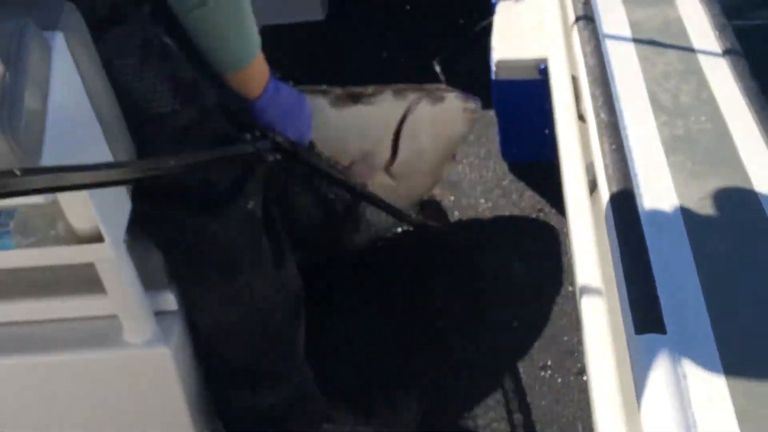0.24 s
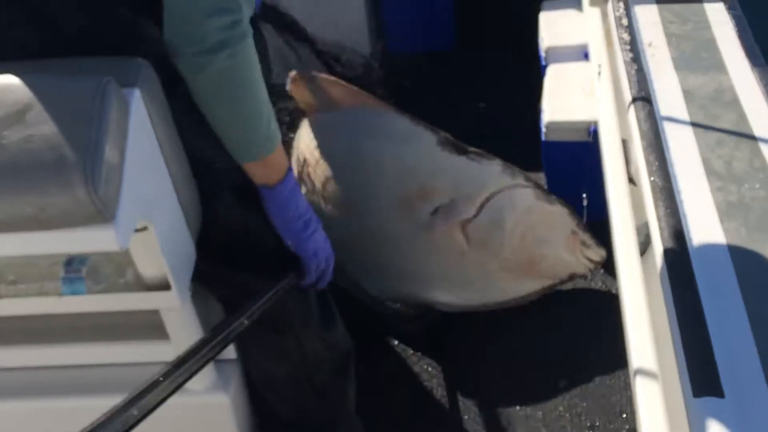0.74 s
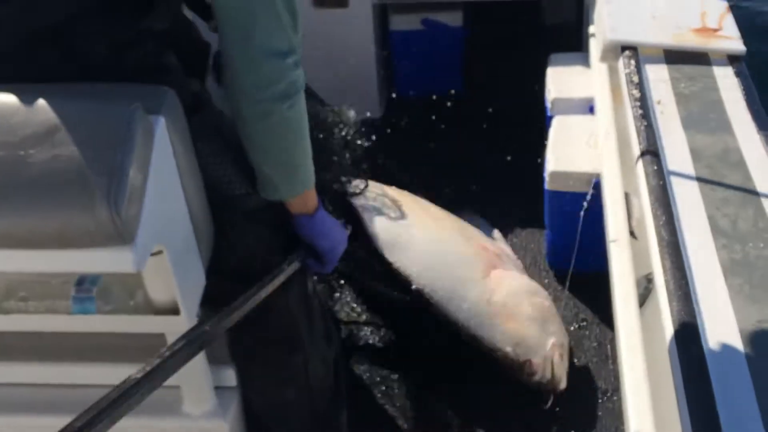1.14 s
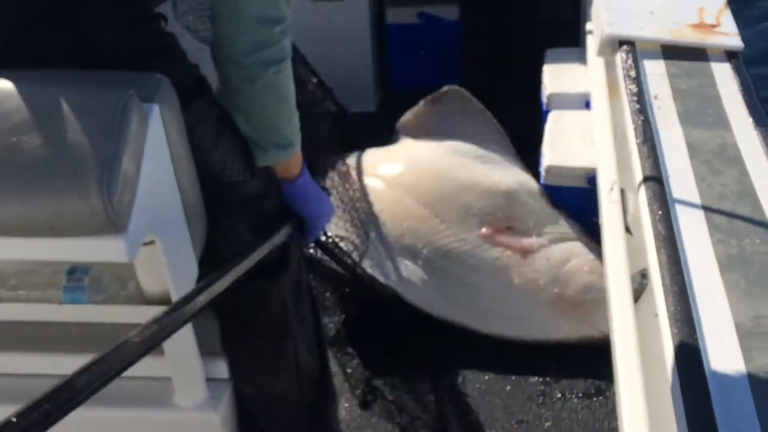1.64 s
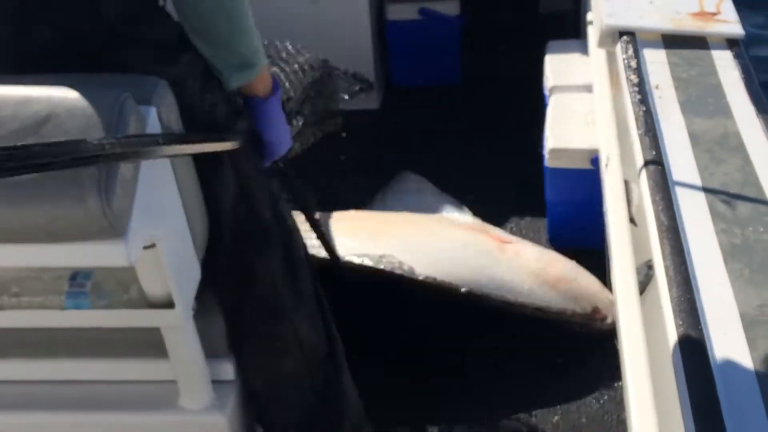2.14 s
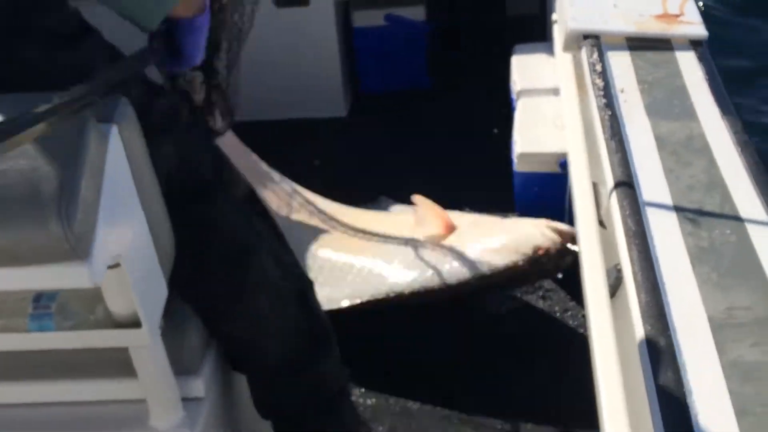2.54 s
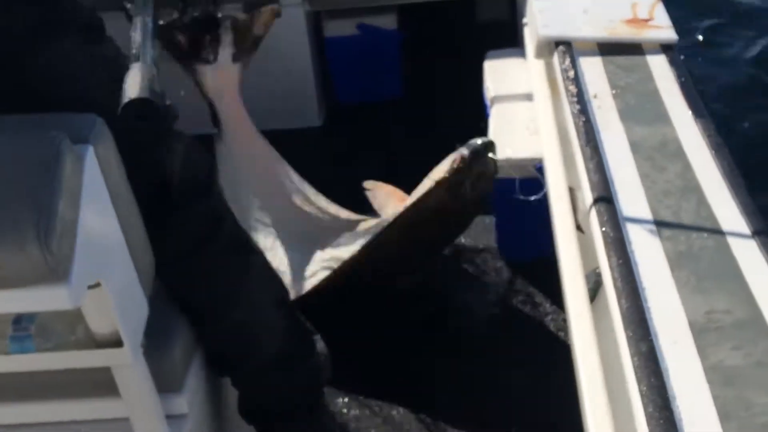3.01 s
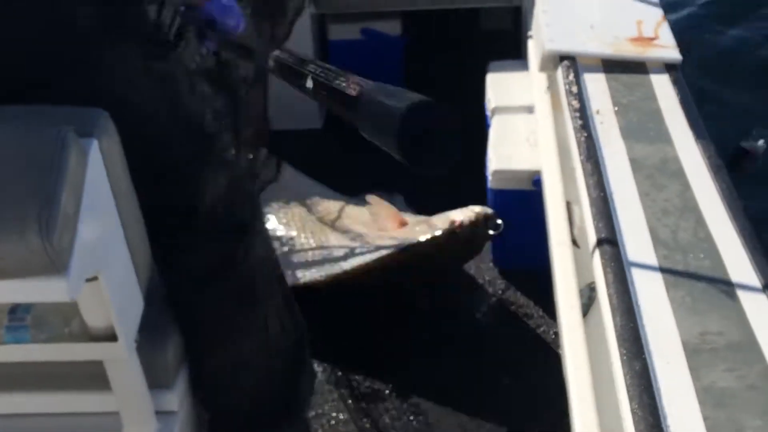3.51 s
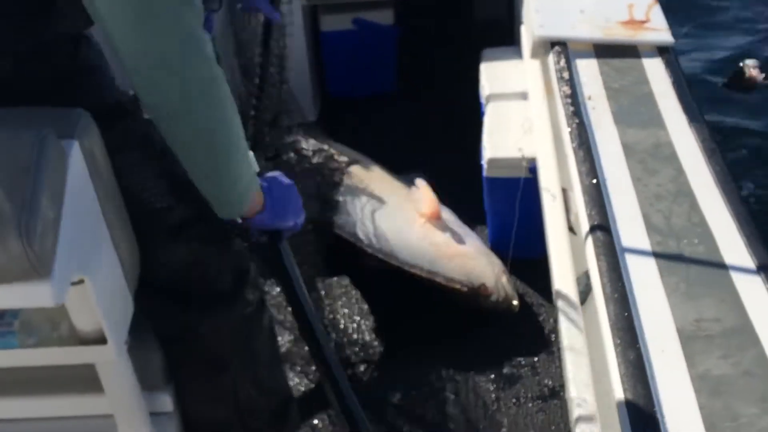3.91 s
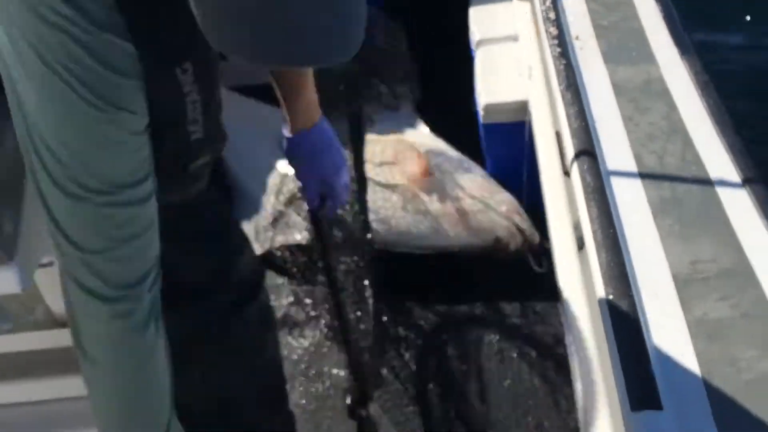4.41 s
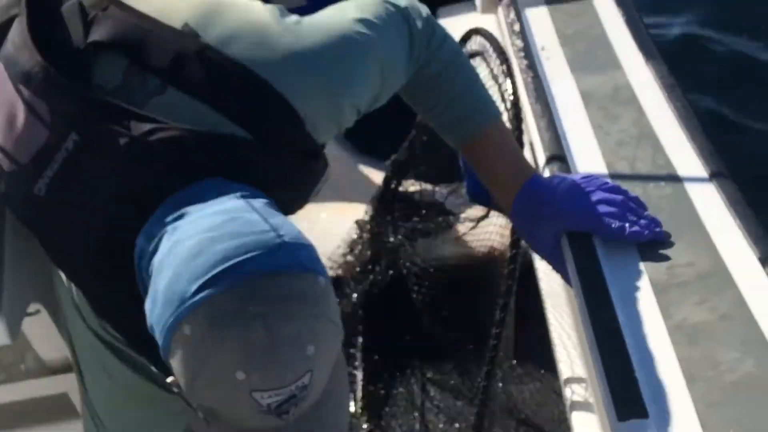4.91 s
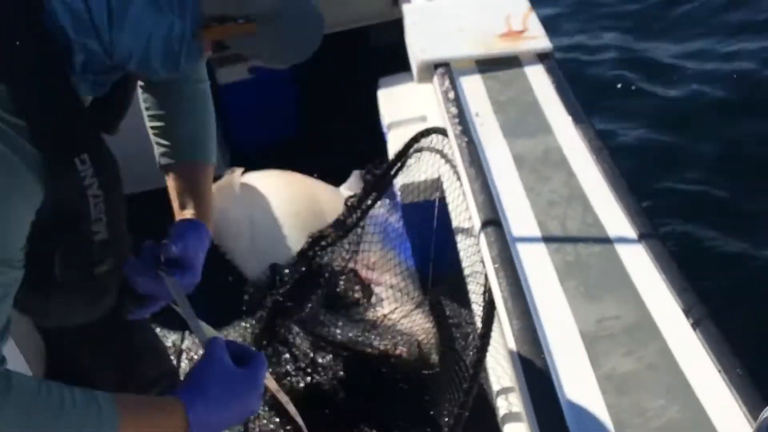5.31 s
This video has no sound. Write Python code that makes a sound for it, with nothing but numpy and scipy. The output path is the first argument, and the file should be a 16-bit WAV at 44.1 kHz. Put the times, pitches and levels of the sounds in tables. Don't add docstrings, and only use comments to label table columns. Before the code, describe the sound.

Close up on a small boat, a big flatfish thrashes in a landing net. Wet slaps and hollow thumps burst out irregularly, the metal pole ringing in the first second. Plastic boxes knock, mesh rasps, skin squeaks faintly. Blows cluster, pause briefly, then return hard before fading to weaker bumps. Short cockpit echo; the loudest hits are squashed by a phone's limiter.

```python
import sys
import numpy as np
from scipy import signal
from scipy.fft import rfft, irfft
from scipy.io import wavfile
from scipy.ndimage import uniform_filter1d, map_coordinates

SR = 44100
rng = np.random.default_rng(int(sys.argv[2]) if len(sys.argv) > 2 else 0)


def invert_db(level):
    return 10 ** (np.asarray(level, dtype=float) / 20)


def transcribe(signal):
    frames = np.atleast_2d(signal).T
    limited = np.clip(frames, -1, 1)
    pcm = np.round(limited * 32767).astype(np.int16)
    wavfile.write(sys.argv[1], SR, pcm)


N = 244755

# frequency [Hz], density [dB per Hz].
BOOM_COLOUR = [(25, 2.5), (50, 7), (85, 11), (120, 16.5), (170, -42)]
# frequency [Hz], density [dB per Hz].
RUB_COLOUR = [(150, 8.5), (400, 14), (900, 8), (1500, -4), (2500, -44)]
# frequency [Hz], density [dB per Hz].
RASP_COLOUR = [(710, 7), (1200, -6), (1870, -1), (3250, -6.5), (7330, -11.5), (12700, -22.5), (15000, -28),
               (16000, -41)]


def unit(x):
    return x / np.sqrt(np.mean(x ** 2) + 1e-20)


def along(points, hz):
    f, v = np.transpose(points)
    f = np.r_[f[0] / 2, f, f[-1] * 2]
    v = np.r_[v[0] - 60, v, v[-1] - 60]
    return np.interp(np.log(hz + 1), np.log(f + 1), v)


def wobble(rate, size=N):
    knots = rng.standard_normal(int(size * rate / SR) + 4)
    return map_coordinates(knots, [np.arange(size) * rate / SR])


def uneven(f, depth_db):
    knots = rng.standard_normal(64)
    return invert_db(depth_db * map_coordinates(knots, [6.52 * np.log2(1 + f / 300)], mode="wrap"))


def noise(response, size=N):
    spectrum = rfft(rng.standard_normal(size))
    return unit(irfft(spectrum * response(np.fft.rfftfreq(size, 1 / SR)), size))


def coloured(points):
    return lambda f: invert_db(along(points, f))


def resonance(f, hz, width_hz):
    return 1j * f * width_hz / (hz * hz - f * f + 1j * f * width_hz)


def deck(f):
    # frequency [Hz], width [Hz], level [dB].
    panels = [(73, 15, -1), (116, 45.4, 1.5), (159.5, 39, 3.5), (225, 40.4, 0), (280, 18, -1.5),
              (330, 43, -7.5)]
    return sum((-1) ** k * invert_db(db) * resonance(f, hz, width) for k, (hz, width, db) in enumerate(panels))


def fade(t, t60, rise):
    return (1 - np.exp(-t / rise)) * invert_db(-60 * t / t60)


def blank(size):
    return np.zeros(N + SR), np.arange(size) / SR


def add(track, s, sound):
    track[round(s * SR):][:len(sound)] += sound


def air():
    # frequency [Hz], density [dB per Hz].
    hiss_colour = [(400, -10), (700, -9), (1300, -12), (4000, -28), (9500, -28), (15500, -27)]
    return invert_db(-54.5 + 1.6 * wobble(12)) * noise(coloured(hiss_colour))


def walls():
    # frequency [Hz], t60 [s].
    decay = [(100, 0.58), (400, 0.22), (2000, 0.056), (10000, 0.061)]
    hz, t, z = signal.stft(rng.standard_normal(SR // 2), SR, nperseg=256)
    t60 = np.interp(hz, *np.transpose(decay))[:, None]
    tail = signal.istft(z * invert_db(-60 * t / t60), SR, nperseg=256)[1]
    return np.pad(tail / np.linalg.norm(tail), (200, 0))


def restless():
    # time in seconds, weight rocking on the deck in dB, sliding in dB.
    unrest = [(0, -31, -27.5), (.29, -18.5, -38.5), (.5, -29, -54), (.74, -43, -24), (.94, -54, -53),
              (1.239, -14, -28), (1.37, -36.5, -53), (1.53, -26, -49), (2.54, -27.5, -52.5),
              (2.749, -35, -24), (3.02, -58, -64), (3.18, -44, -53), (3.39, -33, -50), (3.86, -41.5, -43),
              (4.28, -50, -53), (4.59, -22.5, -22), (4.8, -28.5, -58), (5.55, -48, -37)]
    s, *levels = np.transpose(unrest)
    rumble_db, rub_db = (np.interp(np.arange(N) / SR, s, c) for c in levels)
    boom_db = -39 + 0.11 * (rumble_db - rumble_db.mean())
    rasp_db = -48 + 0.75 * (rub_db - rub_db.mean())
    boom = invert_db(boom_db + 2.5 * wobble(4.9)) * noise(coloured(BOOM_COLOUR))
    rumble = invert_db(rumble_db + 2.37 * wobble(13)) * noise(lambda f: deck(f) * f ** 2 / (f ** 2 + 130 ** 2))
    rub = invert_db(rub_db + 1.7 * wobble(30)) * noise(coloured(RUB_COLOUR))
    grain = invert_db(4.4 * wobble(35) + 1.9 * wobble(500))
    rasp = invert_db(rasp_db) * grain * noise(coloured(RASP_COLOUR))
    return boom + rumble + rub + rasp


def squeaks():
    # start in seconds, level in dB, pitch in Hz,
    # length in seconds.
    slips = [
        (0.662, -34, 1890, 0.18),
        (1.034, -33, 3820, 0.088),
        (3.384, -26, 4600, 0.0068),
        (3.628, -30, 2468, 0.028),
        (4.019, -31, 2460, 0.016),
        (4.234, -28.5, 2386, 0.019),
        (4.853, -32, 3900, 0.029),
        (5.303, -35.5, 2490, 0.049),
    ]
    out = np.zeros(N + SR)
    for s, db, hz, length in slips:
        size = int(2.5 * length * SR)
        t = np.arange(size) / SR
        phase = 2 * np.pi * hz * np.cumsum(1 + 0.0099 * wobble(107, size)) / SR
        level = invert_db(db + 3.5 + 2.4 * wobble(136, size))
        add(out, s, level * np.sin(phase) * fade(t, 3 * length, 0.0014))
    return out[:N]


def drags(table):
    out, t = blank(16384)

    def patch(tilt_db):
        catches = invert_db(3.5 * wobble(45, len(t)) + 3.5 * wobble(800, len(t)))
        return catches * noise(lambda f: invert_db(along(RASP_COLOUR, f) + tilt_db * np.log2(1 + f / 2000))
                               * uneven(f, depth_db=2.6), len(t))

    for s, length, start_db, end_db, tilt_db in table:
        level_db = np.interp(t, [0, length], [start_db, end_db])
        level_db = level_db - 700 * np.maximum(t - length, 0)
        rasp = unit(patch(tilt_db) + patch(tilt_db))
        add(out, s, invert_db(level_db) * (1 - np.exp(-t / 0.0033)) * rasp)
    return out[:N]


def pole():
    # start in seconds, level in dB, seconds until a hand stills it.
    blows = [
        (.215, -20.5, 0.11),
        (0.244, -27, 0.036),
        (0.311, -32, 0.079),
        (.403, -17.5, 0.051),
        (0.454, -21, 0.086),
        (0.481, -29, 0.07),
        (.72, -45, 0.071),
        (.77, -26.5, 0.058),
    ]
    # frequency in Hz, level in dB, t60 in seconds.
    tube = [(856, 0, .45), (965, -2, .3), (1890, -11, .45), (3900, -18, .45)]
    out, t = blank(16384)
    for s, db, free in blows:
        stilled = invert_db(-900 * np.maximum(t - free, 0))
        for hz, level_db, t60 in tube:
            shake_db = rng.normal(0, 1) + 5.0 * wobble(76, len(t))
            note = np.sin(2 * np.pi * hz * t) * fade(t, t60, 0.0019)
            add(out, s, invert_db(db + level_db + shake_db) * stilled * note)
    return out[:N]


def rings():
    # (frequency in Hz, level in dB, t60 in s).
    patches = [(1.009, -9, [(1085, 3.5, 0.055), (2000, -8.5, 0.066)]), (1.118, -13, [(2630, -2, 0.095),
               (6100, -4, 0.06)]), (1.426, -11, [(616, -6, 0.44), (852, 1, 0.098)]),
               (1.81, -15.5, [(685, -1.5, 0.41), (984, -3, 0.1), (1280, -8, 5.0), (1830, -2, 0.054)]),
               (1.943, -14, [(4370, -7, 0.13), (6280, -7, 0.044), (6977, -8, 0.042)]),
               (2.118, -13.5, [(1060, -1, 0.17), (1550, -5, 0.072), (3590, -6, 0.11), (6600, -9, 0.08)]),
               (2.269, -12, [(1840, -2.5, 0.15), (3530, -3, 0.084), (6410, 2.5, 0.019)]),
               (3.223, -15.5, [(856, 0, 0.13), (2270, 11, 0.025)]), (3.431, -16.5, [(973, 0, 5.0),
               (1270, -6, 5.0), (2290, 0, 0.21)]), (3.759, -19, [(1500, -7, 0.38), (3910, 2, 0.2),
               (5000, -9, 0.5), (5870, -1, 0.19)]), (4.063, -21.5, [(1860, -3, 0.77), (2406, -1, 0.092),
               (4355, 1, 0.04)]), (4.845, -19, [(1170, 0.5, 0.089), (4000, -4, 0.07)]),
               (5.184, -19, [(797, 6, 0.25), (2310, -5, 0.082)])]
    # start in seconds, level in dB, frequency in Hz, t60 in seconds.
    lone_notes = [(.195, -32, 3000, 0.055), (.195, -19, 2200, 0.044), (0.25, -28, 4300, .05),
                  (.33, -10.5, 565, 0.15), (.35, -7, 700, 0.082), (.404, -21, 1830, 0.1),
                  (.405, -25, 2600, .06), (0.47, -32, 2500, 0.11), (0.734, -27, 950, 0.37),
                  (.79, -17, 228, 0.35), (.8, -17.5, 330, 0.17), (.78, -21, 710, 0.2),
                  (.79, -25.5, 2710, .1), (1.012, -16, 2900, 0.048), (1.01, -8, 1240, 0.057),
                  (1.74, -12, 190, 0.25), (4.478, -8.5, 360, 0.18), (4.545, -18, 390, 0.12),
                  (1.46, -6.5, 320, 0.18), (2.76, -12.5, 280, 0.36), (.222, -16.5, 840, .15),
                  (1.425, -9.5, 1030, 0.11), (5.185, -23, 890, 0.065), (2, -27, 3710, 0.052),
                  (2.285, -11.5, 560, 0.12), (3.43, -10, 178, 0.11), (3.535, -31, 850, .15),
                  (3.625, -26, 483, 0.1), (3.721, -30, 480, 0.11), (.045, -23, 1950, 0.091),
                  (.49, -32, 4500, 0.18), (0.55, -20, 790, 0.14), (2.699, 1.5, 266, 0.053),
                  (4.473, 0, 207, 0.28), (1.49, -15, 420, .12), (1.226, -13, 680, .07),
                  (4.5, -28, 1900, 0.026), (4.179, -15, 256, 0.11), (4.41, -21, 2020, 0.053),
                  (4.43, -15, 820, .1), (4.899, -36, 1300, .15), (5.23, -29, 470, 0.24),
                  (5.411, -18.5, 1150, 0.054), (5.41, -26, 2530, .07)]
    longest = 0.12
    flutter = wobble(140)
    out, t = blank(16384)
    struck = []
    for s, db, modes in patches:
        struck += [(s, db + level_db, hz, min(t60, longest)) for hz, level_db, t60 in modes]
    for s, db, hz, t60 in struck + lone_notes:
        touch, sway = (flutter[k:][:len(t)] for k in rng.integers(0, N - len(t), size=2))
        shaken = min(hz / 2500, 1)
        note = np.sin(2 * np.pi * hz * t + 0.68 * shaken * sway)
        add(out, s, invert_db(db + 4.6 * shaken * touch) * note * fade(t, t60, 0.00074 + 1.25 / hz))
    return out[:N]


def knocks():
    # time in seconds, peak in dB, pitch in Hz.
    free_knocks = [(.003, -9, 409), (0.253, -10, 832), (.312, -5, 904), (0.401, -13.5, 926),
                   (.469, -24, 846), (.492, -17.5, 784), (.526, -19, 870), (.698, -21, 665),
                   (0.721, -22, 794), (1.424, -5.5, 487), (1.549, -19, 344), (1.687, -18.5, 710),
                   (1.81, -15.5, 744), (2.117, -13, 445), (2.27, -5.5, 728), (2.636, -16, 468),
                   (2.699, -10.5, 358), (2.722, -12, 907), (3.222, -13, 954), (3.301, -13, 381),
                   (3.441, -12.5, 676), (3.726, -21.5, 826), (3.757, -14.5, 756), (3.95, -28, 535),
                   (4.408, -18, 977), (4.845, -21, 623), (5.125, -33.5, 905), (3.76, -8, 537)]
    # time in seconds, peak in dB, pitch in Hz.
    damped_raps = [(.22, -13.5, 960), (.452, -9.5, 790), (.601, -12, 520), (0.958, -26, 810),
                   (1.009, -22, 1080), (1.009, -11.5, 1250), (1.179, -6.5, 683), (1.209, -4, 723),
                   (1.506, -12.5, 546), (1.719, -6.5, 389), (1.969, -10, 400), (2.001, -13, 477),
                   (2.035, -15.5, 443), (2.503, -16, 356), (3.941, -6.5, 1157), (4.097, -9.5, 1220),
                   (4.105, 0.5, 600), (4.438, -9.5, 820), (4.477, 0, 408), (4.54, -7, 554),
                   (5.1838, -4.5, 360), (5.184, -5, 986), (5.19, -12.5, 554)]
    out, t = blank(16384)
    hits = [(*row, 0.4) for row in free_knocks] + [(*row, 0.13) for row in damped_raps]
    for s, db, hz, t60 in hits:
        body = noise(lambda f: resonance(f, hz, 0.96 * hz) ** 2 + 0.72 * invert_db(along(RUB_COLOUR, f)), len(t))
        blow = 1.7 * np.sin(2 * np.pi * hz * t) * fade(t, 0.36 * t60, 0.0008)
        add(out, s - 0.002, invert_db(db - 7.0) * (blow + body * fade(t, t60, 0.00079)))
    return out[:N]


def thumps():
    # time in seconds, peak in dB, pitch in Hz.
    falls = [(.005, -3, 297), (0.235, -3, 114), (0.606, -13.5, 231), (0.692, -6.5, 148), (0.799, -12, 163),
             (1.022, -16, 261), (1.121, -7.5, 290), (1.616, -14, 173), (1.716, -1.5, 287),
             (2.123, -10, 206), (2.273, -8.5, 223), (2.629, -5.5, 205), (2.701, -0.5, 136),
             (2.727, -20, 72.7), (2.727, 3.5, 280), (3.422, -5, 128), (3.765, -1, 130),
             (3.829, -5.5, 180.5), (3.94, -10.5, 163), (4.247, -18, 197), (4.546, 1.5, 165),
             (4.608, -4, 98), (4.77, -21, 330), (5.187, -11, 222), (5.284, -18.5, 153), (5.412, -4, 147.5),
             (3.206, -12, 150), (1.782, -14, 101)]
    # time in seconds, peak in dB, pitch in Hz.
    slow_rolls = [(0.153, -28, 149), (.41, -10, 112), (.944, -16.5, 150), (1.197, -11, 198),
                  (1.25, -11, 127.4), (1.448, -5.5, 348), (1.446, -6, 223), (1.491, -7, 170),
                  (2.026, -12, 296.4), (2.296, -4, 249.4), (2.91, -19.5, 274), (3.061, -23, 90.5),
                  (3.229, 1, 145.2), (3.539, -16, 116), (4.135, -16, 260), (4.44, -10.5, 225),
                  (4.215, -21.5, 303), (4.85, -19, 243), (4.72, -16, 120), (4.87, -11.5, 83.8),
                  (4.97, -14.5, 99.4), (5.059, -23, 63), (5.19, -25, 60), (4.491, -18, 200)]
    out, t = blank(24576)
    for s, db, hz, t60 in [(*row, 0.26) for row in falls] + [(*row, 0.51) for row in slow_rolls]:
        drift = np.cumsum(1 + 0.061 * wobble(22.5, len(t))) / SR
        ring = np.sin(2 * np.pi * hz * drift) * fade(t, 0.41 * t60, 0.0058)
        shudder = noise(lambda f: deck(f) * resonance(f, hz, 1.29 * hz), len(t)) * fade(t, t60, 0.0093)
        heave = invert_db(-17.5) * noise(coloured(BOOM_COLOUR), len(t)) * fade(t, 0.24, 0.013)
        add(out, s - 0.004, invert_db(db - 1.5) * (ring + 0.46 * shudder + heave))
    return out[:N]


def snaps():
    # time in seconds, peak in dB, strongest pitch in Hz.
    films = [(0.1197, -10, 5910), (0.179, -24, 7810), (0.193, -7, 3500), (0.2158, 2, 6070),
             (0.3197, -12, 4150), (0.4022, -1, 2400), (0.4529, -5, 5660), (0.4803, -14, 4440),
             (0.6993, -13, 4400), (1.0087, -8, 3070), (1.1164, -13, 4970), (1.4235, -8, 900),
             (1.5524, -8, 5450), (1.5998, -14, 3880), (1.707, -9, 4720), (1.7164, -2, 444),
             (1.811, -7, 5470), (1.942, -9, 4880), (2.025, -11, 3660), (2.123, 8, 4010), (2.165, -3, 5760),
             (2.2697, -14, 3500), (2.5087, -11, 6850), (2.6613, 2, 7060), (2.6843, -11, 4470),
             (2.714, -2, 4730), (3.2206, -10, 3750), (3.2226, 1, 3190), (3.0532, -32, 9500),
             (3.4294, -5, 3320), (3.686, -28, 5080), (3.718, -6, 8950), (3.7574, -8, 4020),
             (3.8791, -22, 4220), (3.9305, -21, 4250), (3.112, -34, 3000), (4.141, -7, 3370),
             (4.4103, -17, 4430), (4.4458, -8, 3040), (4.4774, -4, 1500), (4.8444, -10, 4000),
             (5.1845, -11, 5330), (5.2545, -27, 6310)]
    out, t = blank(512)
    spits = rng.standard_normal((len(films), len(t)))
    for (s, db, hz), spit in zip(films, spits):
        click = np.sin(2 * np.pi * hz * t) * invert_db(-60 * t * hz / 6)
        add(out, s, invert_db(db - 1) * (click + 0.3 * spit * invert_db(-60 * t / 0.0028)))
    return out[:N]


def slaps():
    # time in seconds, peak in dB, spray above 5 kHz in dB, t60 in seconds.
    flank_slaps = [(0.2159, -3.5, -9, 0.3), (0.3187, 1, -37, 0.18), (0.4533, -10.5, -9, 0.2),
                   (0.6982, -8, -12, 0.43), (0.915, -24, -6, .6), (0.9595, -14, -36, 0.21),
                   (1.0086, -4, -8, 0.22), (1.1743, -7.5, -16, 0.19), (1.2014, 1, -17, 0.12),
                   (1.4288, 0, -20, 0.18), (1.455, -6, -27, 0.17), (2.292, -3.5, -25, 0.16),
                   (2.1237, -2.5, -6, 0.1), (2.2688, -1.5, -17.5, 0.23), (2.607, -24.5, -3, 0.64),
                   (2.7069, -1.5, -10, 0.16), (3.2227, -3, -14.5, 0.29), (3.4302, -1.5, -15, 0.18),
                   (3.7584, 4, -11, 0.18), (3.9373, -15, -20, 0.12), (4.4098, -8, -35, 0.15),
                   (4.476, -11, -8.5, 0.44), (5.1854, -5, -18.5, 0.1), (5.2553, -28, -4.5, 0.62),
                   (5.4024, -12, -13, 0.24)]
    # time in seconds, peak in dB, spray above 5 kHz in dB.
    flank_pats = [(0.4037, -2, -8), (0.4805, -8.5, -9.5), (0.5944, -21, -26), (1.232, -16, -13),
                  (1.322, -25, -21), (1.405, -28.5, -2), (1.548, -4, -14), (1.688, -21, -15),
                  (1.789, -22, -7), (1.8096, -2.5, -19.5), (3.315, -17, -7), (3.626, -17.5, -15),
                  (3.679, -26, -2), (3.717, -24.5, -0.5), (4.063, -10.5, -19), (4.0958, -11.5, -24),
                  (4.1398, -12, -13.5), (4.5263, 1, -17), (4.59, -4.5, -13), (5.393, -15, -16)]
    # time in seconds, peak in dB, spray in dB, strongest pitch in Hz.
    fin_flicks = [(0.0463, -12.5, -11, 2020), (.002, -13.5, -6.5, 2980), (1.599, -9.5, -14, 3850),
                  (1.707, -10, -10.5, 4520), (1.944, -5, -9, 4700), (2.025, -13, -6.5, 3600),
                  (2.165, -23.5, 2, 5760), (2.51, -30.5, 10.5, 7100), (2.5682, -21, -12, 2540),
                  (2.661, -24, 3.5, 6900), (2.685, -16.5, 2, 4470), (3.8742, -15, -17, 4500),
                  (4.0197, -26, -25, 2400), (4.2342, -22.5, -31, 2370), (4.797, -24.5, -20, 2880),
                  (4.8438, -4.5, -12.5, 3400), (4.9296, -19.5, -8, 3200), (5.15, -23.5, -8, 6700),
                  (5.2927, -24, 2, 6900), (5.312, -29, 0, 2490)]
    # time in seconds, peak in dB, spray in dB, strongest pitch in Hz.
    mesh_drips = [(0.0674, -6, -13.5, 2540), (0.1195, -12, -3, 5950), (.193, -5, -7.5, 3230),
                  (3.3838, -25, -9.5, 4450), (2.859, -35, -4, 7000), (2.984, -40, -11, 3974),
                  (3.112, -40, -25, 2600), (3.21, -19, -18, 2000), (4.31, -30, -17, 3000),
                  (5.1, -42, 4.5, 7000), (5.52, -25.5, -10, 2100)]
    # time in s, peak in dB, spray in dB, t60 in s, pitch in Hz.
    first_contacts = [
        (0.313, 2, -36, 0.15, 1310),
        (1.4257, -6.5, -36, 0.11, 1300),
        (2.117, -7.5, -10.5, 0.21, 1410),
        (2.714, -2, 2, 0.02, 7500),
        (3.929, -13.5, -17, 0.38, 5350),
        (1.1167, -2, -5.5, 0.24, 3640),
    ]
    # frequency in Hz, density in dB per Hz.
    smack_colour = [(300, 10.5), (800, 5.5), (1500, -1.5), (3000, -3.5), (5000, -9.5), (8000, -19.5)]
    # frequency in Hz, density in dB per Hz.
    spray_colour = [(2500, -18), (4500, 0.5), (7000, 0.5), (10000, -5.5), (14000, -8), (16000, -18)]
    flank_hz, short_t60, drip_t60 = 1580, 0.14, 0.091
    contacts = [(*row, flank_hz) for row in flank_slaps]
    contacts += [(*row, short_t60, flank_hz) for row in flank_pats]
    contacts += [(s, db, spray_db, short_t60, hz) for s, db, spray_db, hz in fin_flicks]
    contacts += [(s, db, spray_db, drip_t60, hz) for s, db, spray_db, hz in mesh_drips]
    out, t = blank(16384)
    for s, db, spray_db, t60, hz in contacts + first_contacts:
        dull_db = 1.1 * min(spray_db + 12.5, 0)

        def smack_response(f):
            peak = 1 + 2.2 * abs(resonance(f, hz, 0.4 * hz))
            thin = (f / (f + 0.1 * hz)) ** 2
            return invert_db(along(smack_colour, f)) * peak * thin * uneven(f, depth_db=1.8)

        def spray_response(f):
            return invert_db(along(spray_colour, f) + dull_db * np.log2(1 + f / 4000)) * uneven(f, depth_db=1.8)

        smack = invert_db(-11.5) * noise(smack_response, len(t))
        spray = invert_db(spray_db - 5.5 - 12 * t / t60) * noise(spray_response, len(t))
        spray = spray * (1 + 0.51 * invert_db(-60 * t / 0.0089))
        broken = 1 - np.exp(-t / 0.031)
        lumps_db = 2 * broken * wobble(50.4, len(t))
        lumps_db = lumps_db + 1.23 * wobble(201.0, len(t)) + 1.44 * wobble(909, len(t))
        crack = 1 + 0.48 * invert_db(-60 * t / 0.015)
        add(out, s - 0.001, invert_db(db + lumps_db) * crack * (smack + spray) * fade(t, t60, 0.0013))
    return out[:N]


def scene():
    # start in seconds, length in seconds, start in dB, end in dB, tilt in dB per octave.
    body_drags = [
        (0.699, 0.077, -25, -26, 2.5),
        (0.897, 0.087, -30.5, -33.5, 3),
        (1.119, 0.11, -25, -24.5, 6),
        (2.598, 0.065, -38, -29, -2),
        (2.716, 0.1, -14, -31.5, 3),
        (3.936, 0.039, -26, -26, -6),
        (4.438, 0.1, -17, -31.5, 5),
        (4.53, 0.087, -26, -24.5, -1),
        (4.639, 0.063, -27.5, -38, -1.5),
    ]
    brief_brushes = [
        (2.72, 0.018, -12, -22, -4),
        (3.155, .04, -48, -52, 5),
        (3.268, .02, -30, -36, 12),
        (3.56, 0.064, -55, -51, 12),
        (4.996, 0.034, -39.5, -52, 2),
        (5.068, 0.026, -51, -48, 4),
        (.774, 0.042, -20.5, -26, 3),
    ]
    blows = slaps() + knocks() + thumps() + pole() + squeaks() + rings()
    blows = blows + drags(body_drags) + drags(brief_brushes)
    echo = invert_db(-15.0) * signal.fftconvolve(blows, walls())[:N]
    return (blows + echo + restless() + air() + snaps())[None]


def thin_treble(x, under_db, from_hz):
    top_hz = 15900
    hz, _, z = signal.stft(x, SR, nperseg=1024)
    power = abs(z) ** 2
    patch = uniform_filter1d(power, size=7, axis=0)
    luck = uniform_filter1d(rng.standard_normal(z.shape), size=9, axis=0)
    luck_db = 10 * unit(uniform_filter1d(luck, size=4, axis=1))
    slope_db = 45 * np.log2(hz / top_hz + 1e-9)[:, None]
    bar = power.sum(0) * invert_db(luck_db + 2 * under_db + slope_db)
    keep = (patch > bar) | (hz < from_hz)[:, None]
    lid = invert_db(-28 * (hz > top_hz))[:, None]
    return signal.istft(z * keep * lid, SR, nperseg=1024)[1][:N]


def band_limit(x):
    return signal.sosfilt(signal.butter(12, 16500, fs=SR, output="sos"), x)


def record(dry):
    held = 0.97 * dry / (1 + abs(dry) ** 8) ** (1 / 8)
    thinned = thin_treble(held[0], under_db=-57, from_hz=9500)
    return band_limit(thinned[None])


dry = scene()
out = record(dry)
transcribe(out)
```